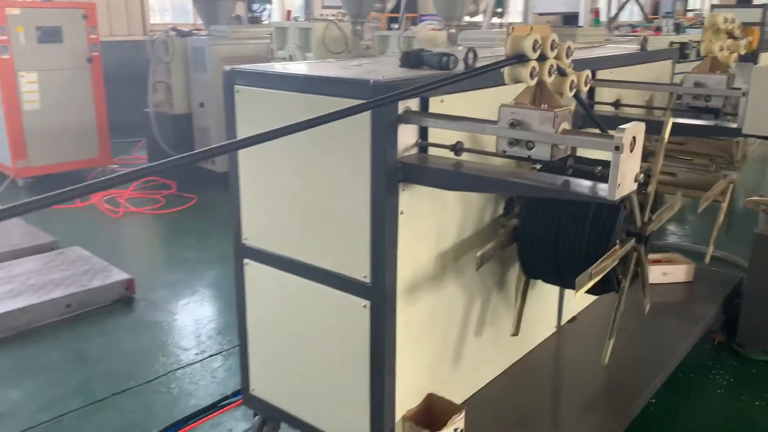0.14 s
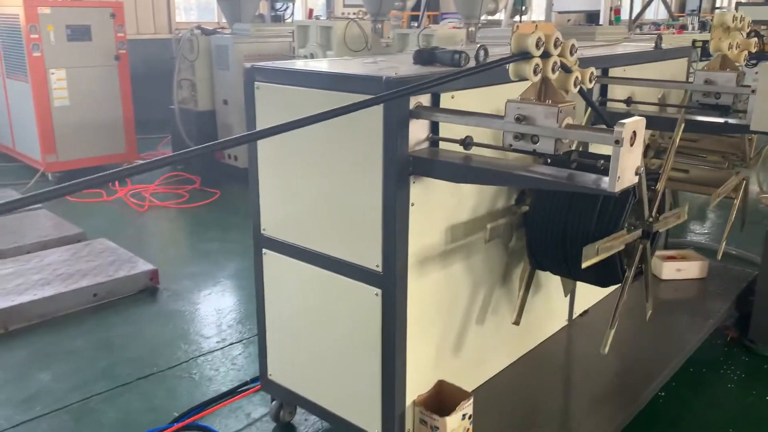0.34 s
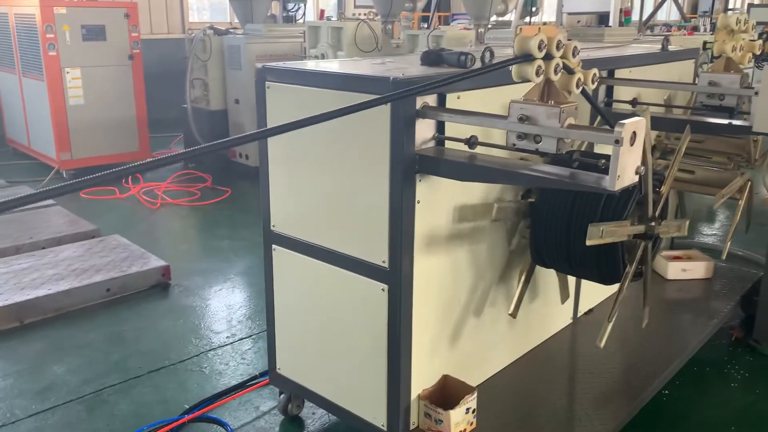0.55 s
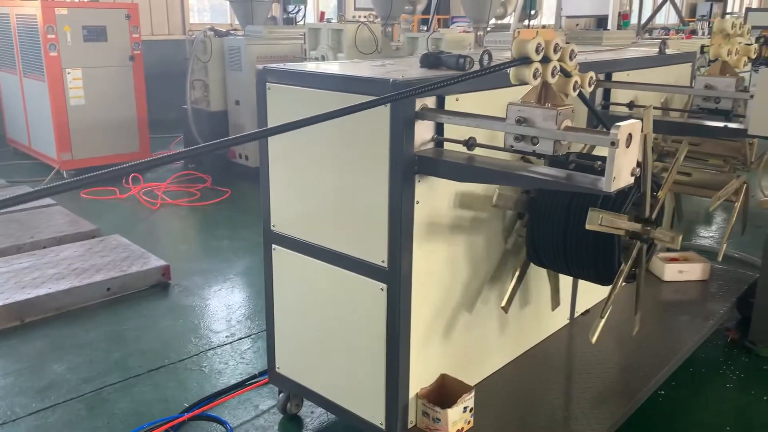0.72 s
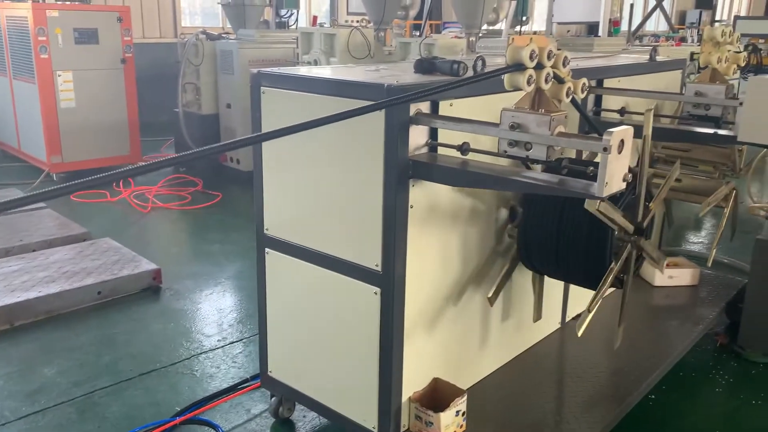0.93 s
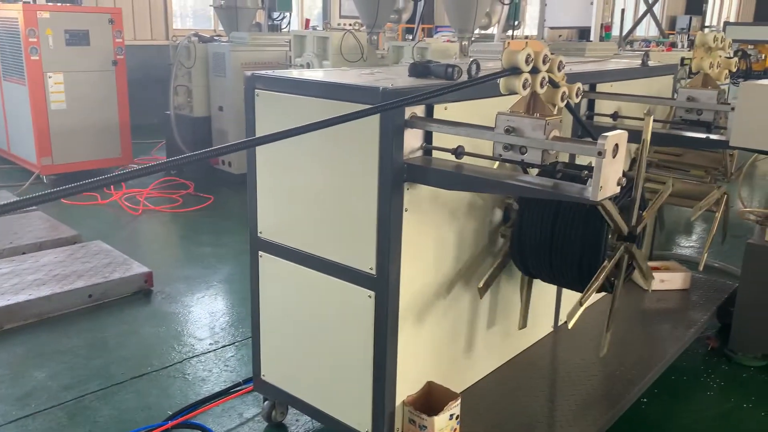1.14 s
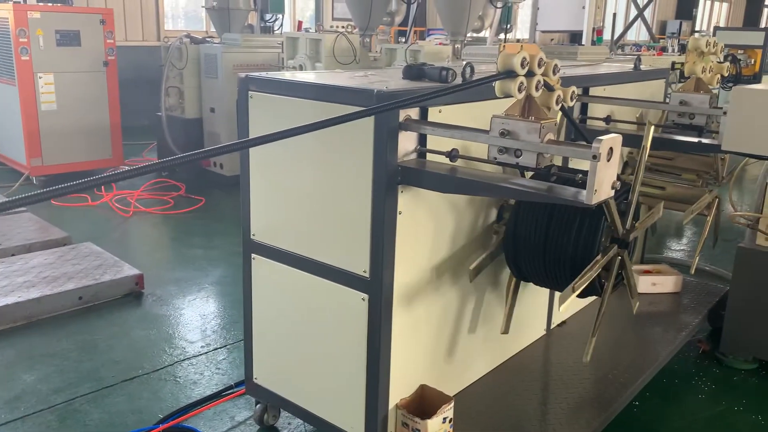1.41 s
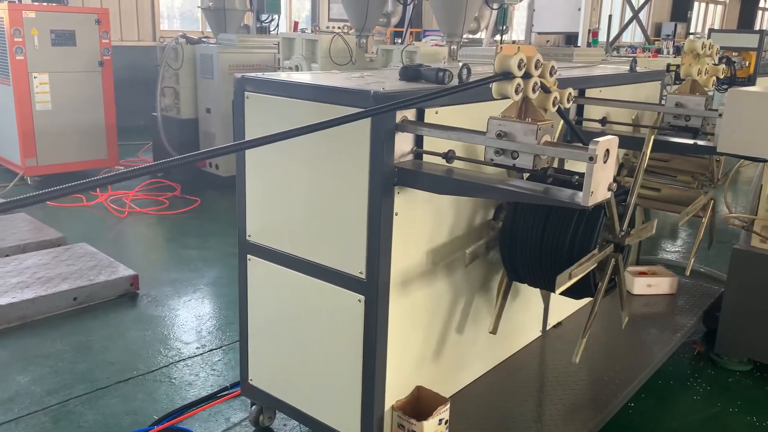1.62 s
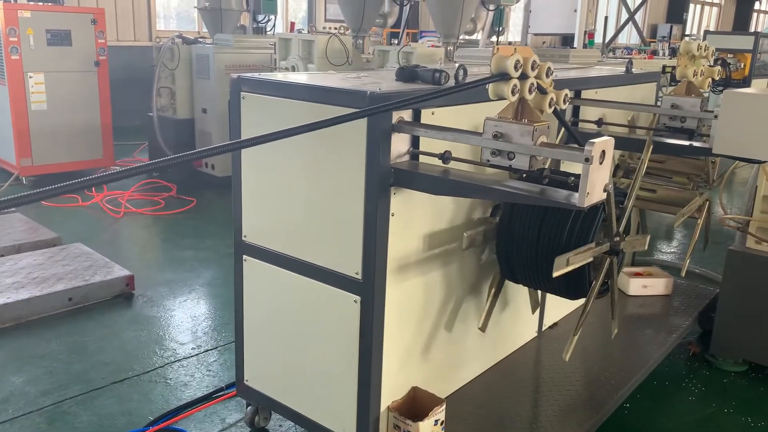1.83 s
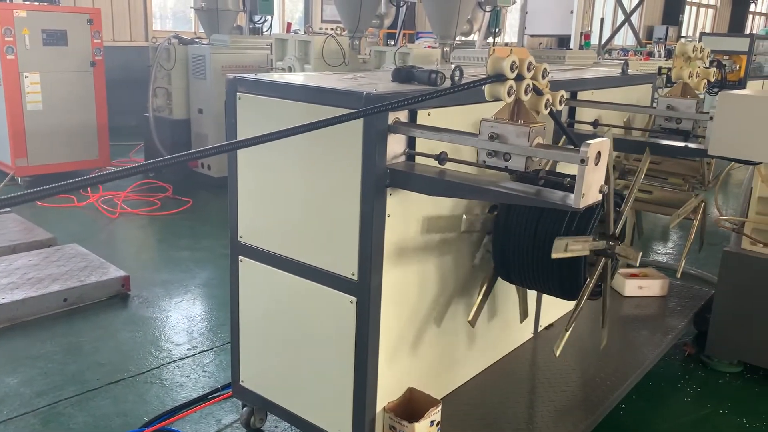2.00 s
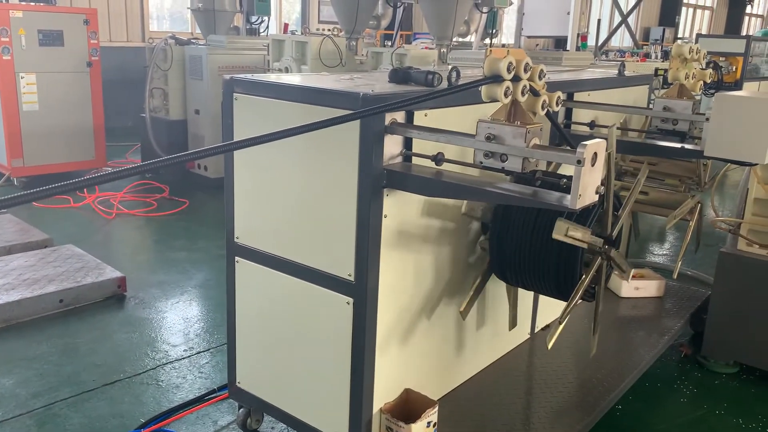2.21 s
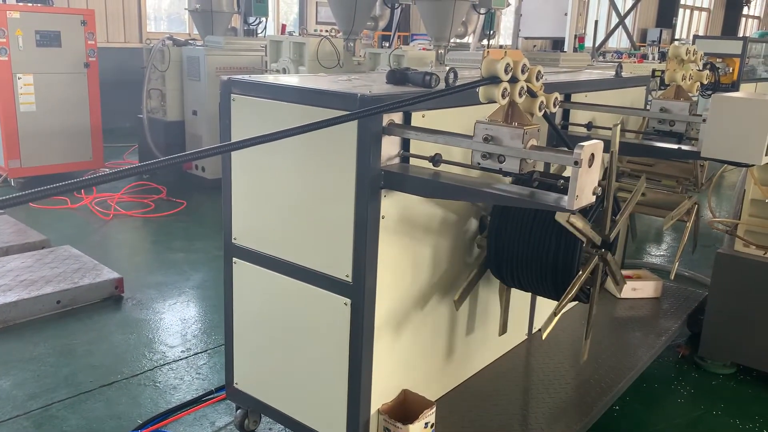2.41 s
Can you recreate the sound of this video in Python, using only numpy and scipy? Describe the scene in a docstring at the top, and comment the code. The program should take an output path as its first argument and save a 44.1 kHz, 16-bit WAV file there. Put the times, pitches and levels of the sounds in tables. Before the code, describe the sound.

Steady roar of running pipe-making machines in a hall, with a short steel clack late on.

```python
"""Pipe extrusion line in a factory hall

Motors and blowers make a broad roar, with a low hum, a thin whistle and faint gear tones.
Above them whines the switching tone of the motor drives, beating against its sidebands.
Near the end a steel part of the winder clacks and rattles briefly, and the hall reverberates."""
import sys
import numpy as np
from scipy import signal
from scipy.fft import rfft, irfft, next_fast_len
from scipy.io import wavfile
from scipy.ndimage import uniform_filter1d, map_coordinates

SR = 44100
rng = np.random.default_rng(int(sys.argv[2]) if len(sys.argv) > 2 else 0)


def waveform_to_disk(signal):
    """Save audio, clipped to [-1, 1], as 16-bit WAV at the path in sys.argv[1]."""
    frames = np.transpose(np.atleast_2d(signal))
    scaled = np.clip(frames, -1, 1) * 32767
    samples = np.round(scaled).astype(np.int16)
    wavfile.write(sys.argv[1], SR, samples)


N = 112455
T = np.arange(N) / SR


def blowers():
    """Turbulence radiates broadband noise: the machines' roar, a low churning that swells, and air hiss."""
    # Each row: frequency in Hz, relative spectral density in dB.
    roar_spectrum = [(20, -37.5), (35, -16.5), (50, -7), (66, -5.5), (78, -10.5), (90, -8), (105, -5.5),
                     (180, -2), (240, -2), (350, -3.5), (520, -6.5), (640, -2.5), (790, -7), (860, -6.5),
                     (1100, -9), (1350, -10), (1500, -9), (1700, -13), (2000, -12), (2320, -14.5),
                     (2480, -21.5), (3500, -21.5), (4300, -25), (4750, -33.5), (6500, -39), (9000, -47.5)]
    churn_spectrum = [(130, -26), (205, -8), (260, -1.5), (340, 0), (430, -1), (600, -7), (900, -33),
                      (2000, -63)]
    hiss_spectrum = [(2000, -20), (5000, -1), (8000, 0), (11500, 0)]
    # Each row: time in seconds, level in dB.
    roar_levels = [(0, -26.5), (.6, -27), (1.1, -26), (1.6, -28.5), (2.1, -27.2), (2.55, -28.5)]
    churn_levels = [(0, -39.5), (.15, -32), (.5, -36), (.95, -34.5), (1.1, -33.5), (1.25, -30.5),
                    (1.42, -30.5), (1.6, -33.5), (2.0, -34.5), (2.3, -34.5), (2.55, -40.5)]
    roar = envelope(roar_levels) * diffuse_noise(roar_spectrum, patchy_db=1.99, ripple_db=2)
    churn = envelope(churn_levels) * diffuse_noise(churn_spectrum, patchy_db=1.0, ripple_db=2)
    hiss = amp(-48) * diffuse_noise(hiss_spectrum, patchy_db=-5.0, ripple_db=2.5)
    return roar + churn + hiss


def motors():
    """Periodic forces in motors and gears radiate a line spectrum: hum, rumble, whistle and gear tones."""
    # Each row: time in seconds, level in dB.
    hum_levels = [(0, -26), (.2, -33), (.28, -35), (.4, -27.5), (.53, -29), (.7, -37), (1.1, -38),
                  (1.4, -43.5), (2.2, -41), (2.5, -35.5)]
    octave_levels = [(0, -46.5), (.12, -35.5), (.25, -33.5), (.5, -31.5), (.8, -38), (1.0, -49), (1.5, -40),
                     (1.75, -32.5), (2.15, -31), (2.38, -35.5), (2.55, -37.5)]
    rumble_levels = [(0, -38), (.5, -38.5), (.7, -30.5), (.9, -37.5), (1.05, -44), (1.35, -38.5),
                     (1.55, -39.5), (1.8, -37.5), (1.93, -31), (2.12, -32), (2.3, -40.5), (2.55, -35)]
    whistle_levels = [(0, -49), (.32, -53), (.42, -44.5), (.8, -39.5), (1.2, -38), (2.0, -39.5),
                      (2.55, -37.5)]
    gear_levels = [(0, -52), (.4, -51), (.6, -43), (1.05, -43), (1.3, -54), (1.8, -55), (2.0, -41),
                   (2.3, -44), (2.55, -43)]
    # Faint steady tones. Each row: frequency in Hz, level in dB, phase lead of the left in radians.
    faint_tones = [(99.7, -45, -0.41), (866, -54, -0.31), (1148, -57, -0.49), (1247, -55, -1.3),
                   (1355, -56, -2.2), (2245, -56, -0.97), (3600, -61, 0.83), (3887, -63, 2),
                   (4877, -62, -1.6), (5163, -66, -1), (5992, -64, -1.6), (6245, -64, 1)]
    hum_hz = 150
    hum = envelope(hum_levels) * tone(hum_hz)
    octave = envelope(octave_levels) * tone(2 * hum_hz)
    rumble = envelope(rumble_levels) * tone(hz=125.5, drift_rad=1.3, waver_db=3.0)
    whistle = envelope(whistle_levels) * tone(hz=2346.7, lead_rad=-1.59)
    faint = sum(amp(db) * tone(hz, lead, drift_rad=1.0, waver_db=0) for hz, db, lead in faint_tones)
    gear = envelope(gear_levels) * tone(hz=734, lead_rad=-0.39, drift_rad=0.89, waver_db=-2.0)
    return hum + octave + rumble + whistle + gear + faint


def drives():
    """Beating: the switching tone of the motor drives interferes with its close sidebands."""
    # Each row: frequency in Hz, relative level in dB.
    switching_tones = [(7961, -64), (7977, -56), (8000, -51), (8024, -56), (8039, -64), (8183, -70),
                       (8213, -67), (8238, -69), (8304, -68)]
    return sum(amp(db + 3) * tone(hz, lead_rad=np.pi / 2, drift_rad=1.0, waver_db=1.8)
               for hz, db in switching_tones)


def winder_clack():
    """Impact excitation: each contact cracks and rings the same steel modes, which drop fast, then linger."""
    # A quick cluster, then a weaker rattle. Each row: start in seconds, relative level in dB.
    contacts = [(1.9738, -14.5), (1.9772, -16.5), (1.9815, -16.5), (1.9862, -19), (2.013, -29),
                (2.019, -27), (2.026, -26), (2.035, -27), (2.0575, -26.5), (2.069, -27.5), (2.113, -33)]
    # Each row: mode frequency in Hz, relative strike level in dB, strike T60 in seconds,
    # relative level of the lingering ring in dB.
    steel_modes = [(1900, -9, .15, -22), (2250, -9, .1, -24), (2966, -16, .1, -28), (3400, -2.5, .06, -25),
                   (3890, -3, .1, -18), (4060, -7, .08, -20), (4290, -7, .14, -17), (4860, 4, .055, -26),
                   (4990, 0, .05, -28), (5163, -4, .06, -23), (5665, -9, .12, -21), (6050, -9, .12, -21),
                   (6240, -5, .1, -20), (8580, -8, .14, -20), (8931, -13, .14, -24), (9200, -9, .14, -22),
                   (9430, -14, .14, -24), (9850, 1, .08, -20), (10000, -2, .12, -19), (10400, -7, .08, -25),
                   (10620, -1, .12, -20)]
    # Contact noise. Each row: frequency in Hz, relative spectral density in dB.
    crack_spectrum = [(300, -14), (1500, 1), (2700, -2), (3600, 3), (4600, 0), (5500, 1), (7000, -2),
                      (9000, -2), (11500, -1)]
    ring_db, linger_t60_s, linewidth_hz = -13, .62, 24
    crack_db, crack_t60_s = -3, .035
    hz, strike_db, strike_t60_s, linger_db = np.transpose(steel_modes)[:, :, None]
    clack = np.zeros((2, N))
    for start_s, contact_db in contacts:
        start = round(start_s * SR)
        t = T[:min(N - start, SR // 2)]
        # A random walk of phase broadens each mode into a narrow band.
        walk = np.cumsum(rng.standard_normal((2, len(hz), len(t))), axis=2)
        jangle = walk * np.sqrt(2 * np.pi * linewidth_hz / SR)
        phase = 2 * np.pi * (hz * t + rng.random((2, len(hz), 1))) + jangle
        decay = amp(strike_db - 60 * t / strike_t60_s) + amp(linger_db - 60 * t / linger_t60_s)
        mode_gains = amp(rng.standard_normal(hz.shape))
        ring = amp(ring_db) * (mode_gains * decay * np.sin(phase)).sum(axis=1)
        noise = filtered(rng.standard_normal((2, N)), lambda f: amp(curve_at(crack_spectrum, f)))
        crack = amp(crack_db - 60 * t / crack_t60_s) * unit_rms(noise)[:, :len(t)]
        clack[:, start:start + len(t)] += amp(contact_db) * (ring + crack)
    return clack


def hall(source):
    """Reverberation: dense reflections build up, then decay exponentially, fastest in the high treble."""
    # Each row: frequency in Hz, reverberation time T60 in seconds.
    decay_times = [(500, .63), (4000, .68), (10000, .58)]
    build_s = .02
    hz, t, spectra = signal.stft(rng.standard_normal((2, SR)), SR, nperseg=256)
    decay = amp(-60 * t / curve_at(decay_times, hz)[:, None])
    onset = 1 - np.exp(-t / build_s)
    tail = signal.istft(spectra * decay * onset, SR, nperseg=256)[1]
    return signal.fftconvolve(source, tail / np.linalg.norm(tail[0]), axes=1)[:, :N]


def diffuse_noise(spectrum, patchy_db, ripple_db):
    """Stereo noise of rms 1 with drifting patches of gain; interfering reflections ripple its spectrum."""
    # Each row: frequency in Hz, correlation of left and right from -1 to 1.
    correlation = [(35, .995), (60, .99), (110, .6), (190, .71), (350, .6), (630, .19), (1140, .07),
                   (2050, 0), (2800, -.37), (3600, -.61), (4300, .1), (5200, .7), (6000, .17), (6500, -1),
                   (7600, -1), (9200, .9), (10700, -1)]
    ripple_spacing_hz, ripple_onset_hz = 30, 400
    spectra = signal.stft(rng.standard_normal((2, N)), nperseg=1024)[2]
    patches = uniform_filter1d(rng.standard_normal(spectra.shape[1:]), size=4, axis=0)  # over frequency
    patches = uniform_filter1d(patches, size=8, axis=1)  # over time
    noise = signal.istft(spectra * amp(patchy_db * unit_rms(patches)), nperseg=1024)[1][:, :N]
    knots = rng.standard_normal(SR // ripple_spacing_hz)

    def mid_side_gains(hz):
        """The rippled spectrum, its power divided between mid and side to set the correlation."""
        depth_db = ripple_db * hz / (hz + ripple_onset_hz)
        ripple = depth_db * map_coordinates(knots, [hz / ripple_spacing_hz])
        angle = np.arccos(np.clip(curve_at(correlation, hz), -1, 1)) / 2
        return amp(curve_at(spectrum, hz) + ripple) * [np.cos(angle), np.sin(angle)]

    mid, side = filtered(noise, mid_side_gains)
    return unit_rms(np.array([mid + side, mid - side]))


def tone(hz, lead_rad=0, drift_rad=.25, waver_db=.9):
    """A stereo sinusoid of rms 1 under slow phase and amplitude modulation; the left leads by lead_rad."""
    phase = 2 * np.pi * (hz * T + rng.random()) + drift_rad * wobble(5.7)
    gain = amp(waver_db * wobble(10.07))
    return unit_rms(gain * np.sin([phase + lead_rad / 2, phase - lead_rad / 2]))


def wobble(knots_per_s):
    """Slow random fluctuation: a spline through Gaussian knots."""
    return map_coordinates(rng.standard_normal(int(N * knots_per_s / SR) + 4), [T * knots_per_s])


def filtered(x, response):
    """Linear filtering: the spectrum of x times a function of frequency in Hz."""
    size = next_fast_len(N + SR // 2)
    return irfft(rfft(x, size) * response(np.fft.rfftfreq(size, 1 / SR)), size)[..., :N]


def envelope(points):
    """Gain per sample, interpolated between points of time in seconds and level in dB."""
    return amp(np.interp(T, *np.transpose(points)))


def curve_at(points, hz):
    """Value at hz, interpolated on a logarithmic frequency axis."""
    frequencies, values = np.transpose(points)
    return np.interp(np.log(hz + 1), np.log(frequencies + 1), values)


def amp(db):
    """Amplitude ratio of a level in decibels."""
    return 10 ** (np.asarray(db) / 20)


def unit_rms(x):
    """Normalisation to an rms of 1."""
    return x / np.sqrt(np.mean(x ** 2) + 1e-20)


def scene():
    """Superposition of the running machinery, the clack and its reverberation."""
    # Stereo balance of blowers and motors. Each row: frequency in Hz, left minus right level in dB.
    balance = [(60, -0.2), (250, -3), (600, -0.9), (1200, -0.5), (2500, 1.1), (6000, 0)]
    sides = np.array([[.5], [-.5]])
    drone = filtered(blowers() + motors(), lambda hz: amp(curve_at(balance, hz) * sides))
    whine = drives()
    clack = winder_clack()
    return drone + whine + clack + amp(-8.5) * hall(clack)


def record(dry):
    """Band limiting: a steep low-pass filter removes the highest treble."""
    cutoff_hz = 11300
    return filtered(dry, lambda hz: 1 / np.sqrt(1 + (hz / cutoff_hz) ** 160))


dry = scene()
out = record(dry)
waveform_to_disk(out)
```